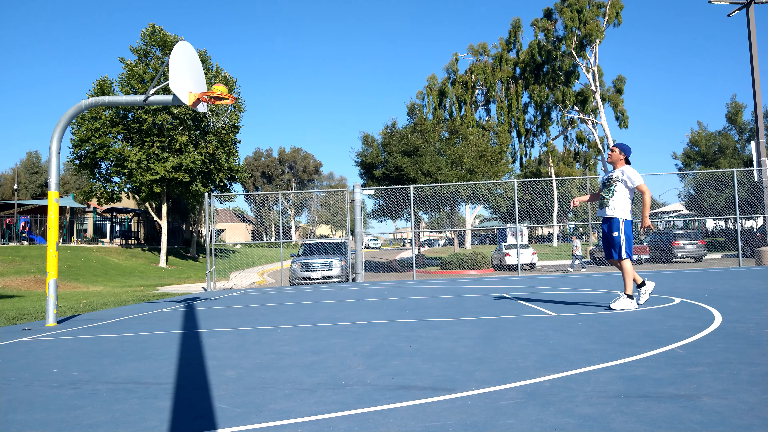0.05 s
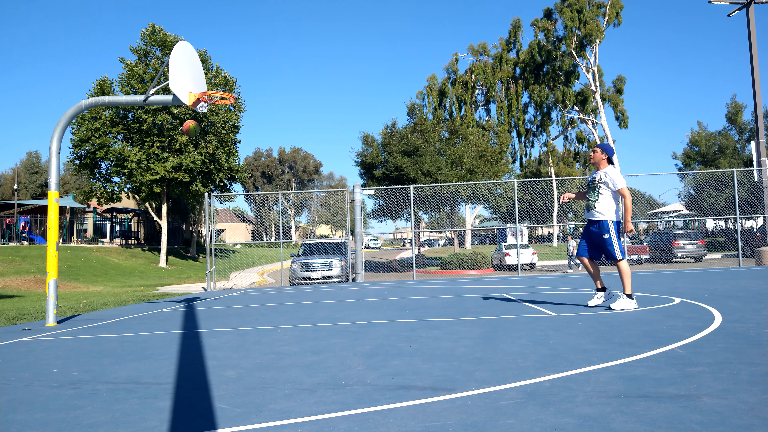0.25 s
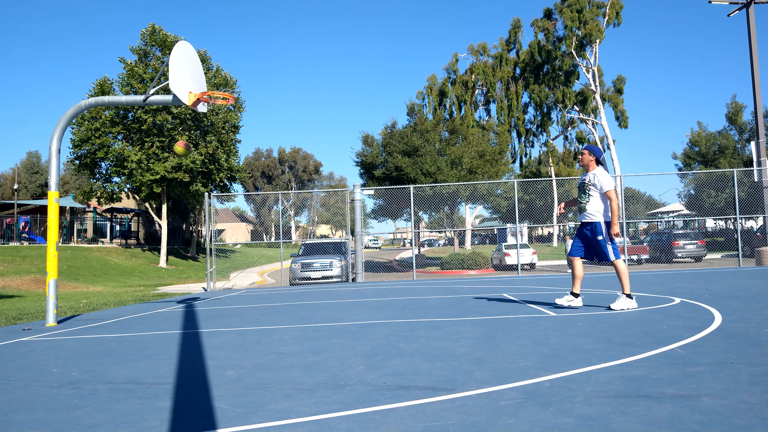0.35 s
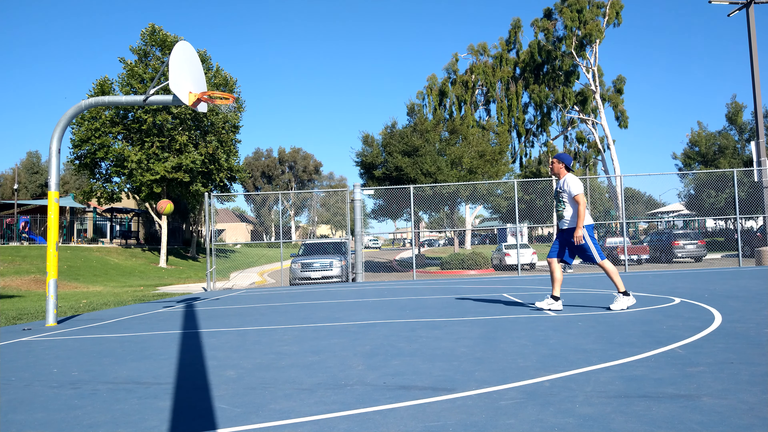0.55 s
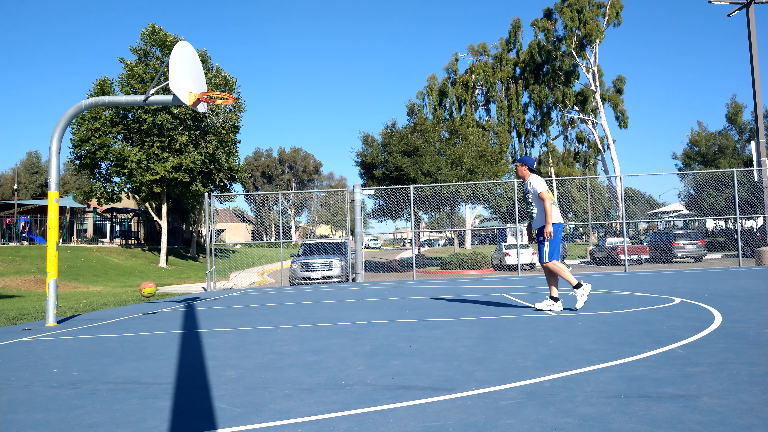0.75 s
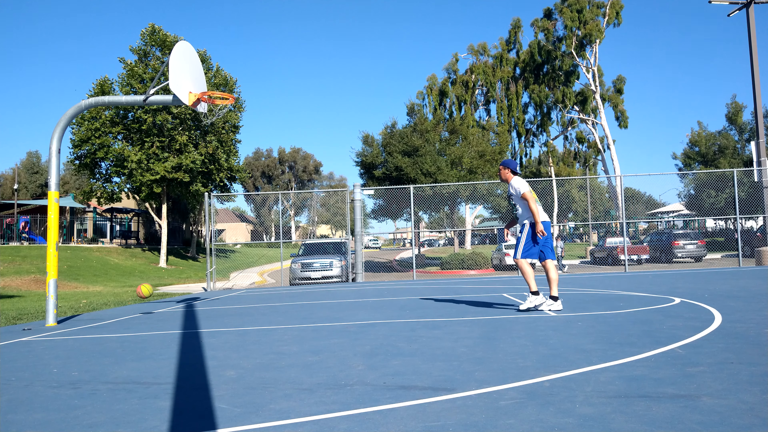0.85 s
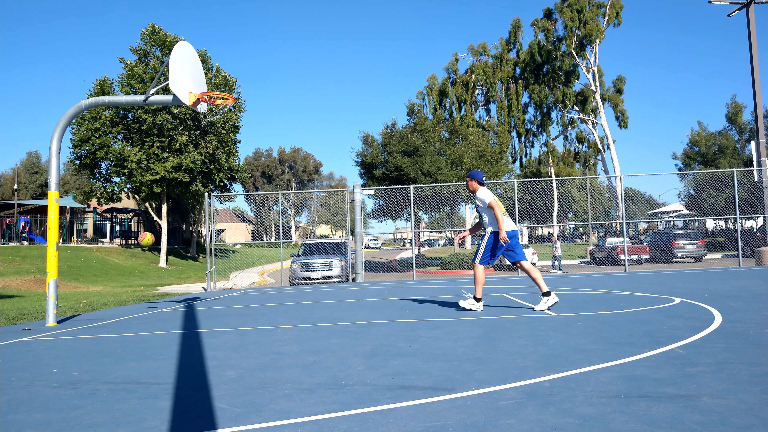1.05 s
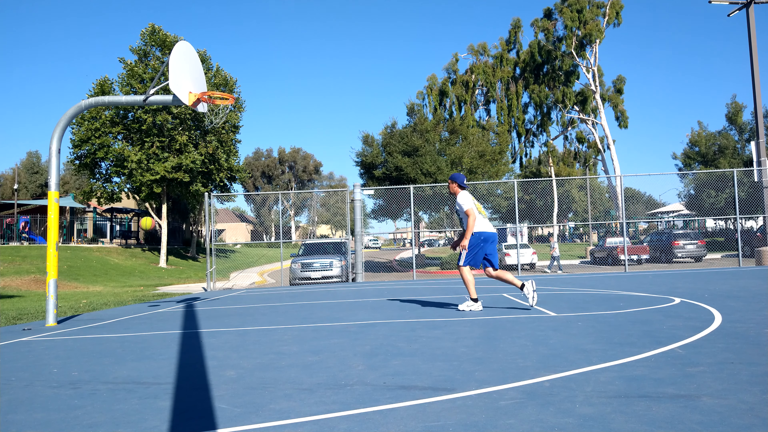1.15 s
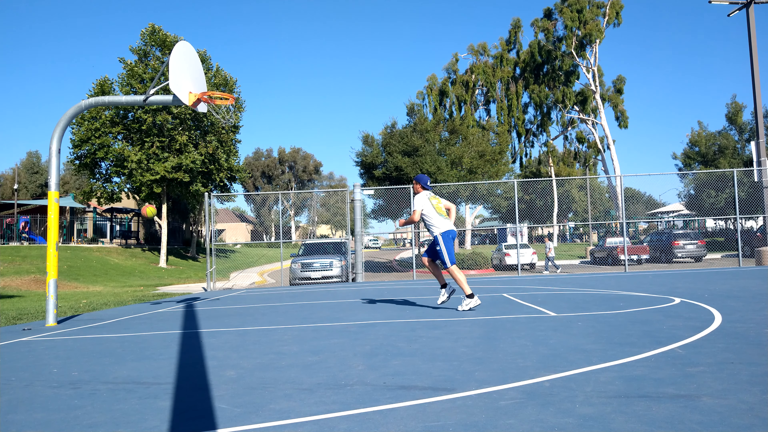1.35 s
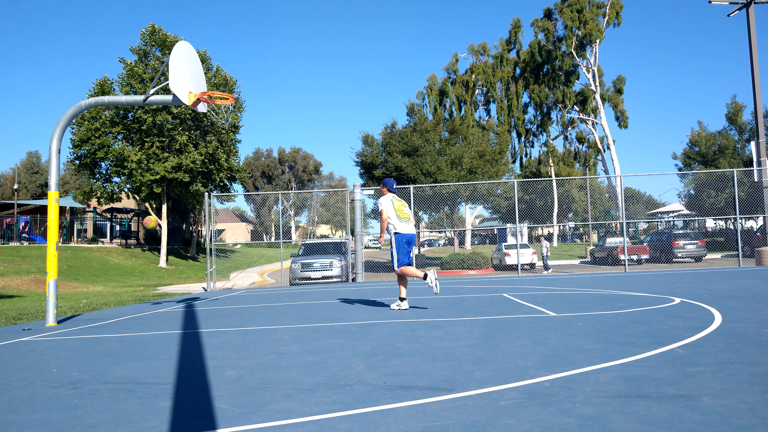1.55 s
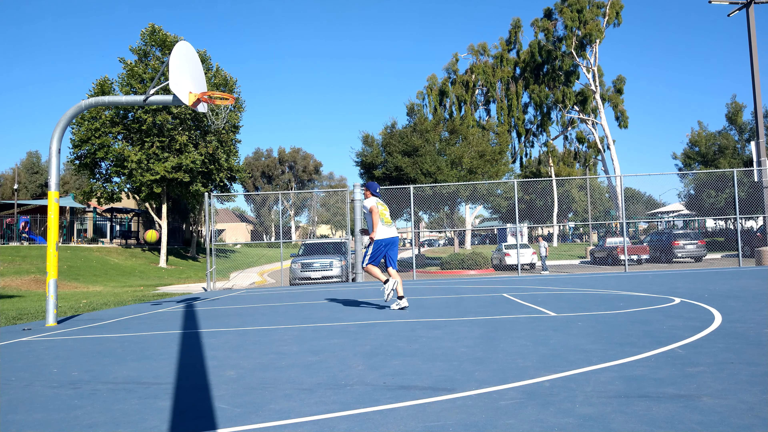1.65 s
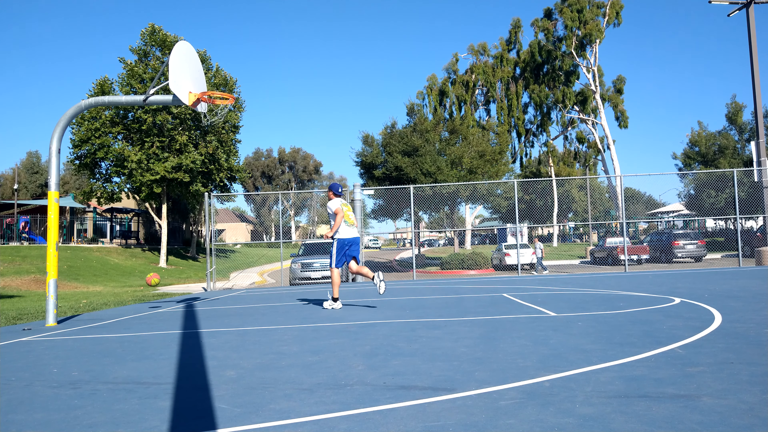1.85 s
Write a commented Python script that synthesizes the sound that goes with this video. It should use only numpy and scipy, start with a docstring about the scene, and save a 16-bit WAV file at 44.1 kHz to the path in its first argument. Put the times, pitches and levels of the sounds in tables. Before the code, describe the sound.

A basketball brushes through a chain net on the left at about 0.2 seconds, just after a soft step. The links jingle, swinging back loudly around 0.6 seconds, while hoop and backboard rattle. Just before 1 second the ball hits the asphalt with a sharp slap, a hollow ping and a short echo. Faint steps follow at 1.3 and 1.7 seconds as the chain settles. Distant traffic rumbles throughout.

```python
"""An outdoor basketball court, distant town rumble all round, the basket left of a stereo microphone.
A shoe lands softly, then the ball brushes through the chain net: the links jingle and swing back,
and the hoop and backboard rattle on. Just before the one-second mark the ball hits the asphalt with
a sharp slap and a ping of the air inside, echoing from the far side. Two more faint steps follow
from the player ahead while the chain settles."""
import sys
import numpy as np
from scipy import signal
from scipy.fft import rfft, irfft, next_fast_len
from scipy.io import wavfile

SR = 44100
rng = np.random.default_rng(int(sys.argv[2]) if len(sys.argv) > 2 else 0)


def persist_wave(psi):
    """Save psi, clipped to +-1, as 16-bit WAV."""
    counts = np.round(np.clip(psi, -1, 1) * 32767).astype(np.int16)
    wavfile.write(sys.argv[1], SR, np.atleast_2d(counts).T)


N = 83790

# links clashing and dragging on each other (time [s], level [dB])
LINK_CLASH = [(.217, -94), (.226, -44), (.255, -49.5), (.3, -49.5), (.38, -52.5), (.42, -63), (.465, -63),
              (.49, -53), (.53, -60.5), (.565, -40), (.628, -38), (.69, -51), (.8, -51.5), (.93, -58),
              (1.07, -74), (1.26, -63.5), (1.36, -74.5), (1.48, -69.5), (1.6, -83), (1.9, -94)]
LINK_HITS_PER_S, LINK_SPREAD_DB = 1800, 3.2
BOUNCE_S = .9474


def undb(db):
    """Decibels to gain."""
    return 10 ** (np.asarray(db) / 20)


def unit(x):
    """Scale to rms 1."""
    return x / np.sqrt(np.mean(x ** 2))


def energy_one(x):
    """Scale a response so that it keeps the power of what passes."""
    return x / np.sqrt(np.sum(x ** 2))


def clock():
    """Time of every sample in seconds."""
    return np.arange(N) / SR


def curve(rows):
    """Gain along (time [s], level [dB]) points."""
    return undb(np.interp(clock(), *np.array(rows).T))


def envelope(start, attack, hold, decay):
    """Linear attack, hold, exponential release, all in seconds."""
    t = clock() - start
    return np.clip(t / attack, 0, 1) * np.exp(-np.maximum(t - attack - hold, 0) / decay)


def convolve(x, response):
    """Pass a sound through a response."""
    return signal.fftconvolve(x, response)[:N]


def colour(x, points):
    """Minimum-phase filter through (frequency [Hz], gain [dB]) points."""
    size = 4096
    hz, db = np.array(points).T
    bin_hz = np.arange(size // 2 + 1) * SR / size
    gain = undb(np.interp(np.log(bin_hz + 1), np.log(hz), db))
    cepstrum = irfft(np.log(gain))
    cepstrum[1:size // 2] *= 2
    cepstrum[size // 2 + 1:] = 0
    return convolve(x, irfft(np.exp(rfft(cepstrum))))


def ring(start, hz, t60):
    """One decaying mode."""
    t = np.maximum(clock() - start, 0)
    return np.sin(2 * np.pi * hz * t) * np.exp(-np.minimum(np.log(1000) * t / t60, 100))


def strike(start, modes):
    """All modes of an object after one blow."""
    return sum(undb(db) * ring(start, hz, t60) for hz, db, t60 in modes)


def clicks(per_s, spread_db):
    """Random collisions of uneven strength, rms 1."""
    strength = undb(spread_db * np.minimum(rng.exponential(size=N), 4))
    hits = rng.random(N) < per_s / SR
    return unit(hits * strength * np.sign(rng.standard_normal(N)))


def noise(points):
    """Coloured noise, rms 1."""
    return unit(colour(rng.standard_normal(N), points))


def burst(start, attack, hold, decay):
    """A burst of white noise, energy 1."""
    return energy_one(rng.standard_normal(N) * envelope(start, attack, hold, decay))


def from_left(x, lag_s):
    """Sound from the left reaches the microphone's right side a little later."""
    size = next_fast_len(N + SR // 10)
    delay = np.exp(-2j * np.pi * np.fft.rfftfreq(size, 1 / SR) * lag_s)
    return np.array([x, irfft(rfft(x, size) * delay, size)[:N]])


def town():
    """Distant traffic, its low rumble nearly alike in both channels."""
    # traffic spectrum (frequency [Hz], gain [dB])
    traffic = [(15, -68), (25, -29.5), (87, -1), (195, -12.5), (301, -22), (394, -18.5), (489, -19.5),
               (531, -26), (1100, -25.5), (1230, -29), (1890, -32), (3620, -44), (16000, -60)]
    mid = noise(traffic)
    side = colour(noise(traffic), [(60, -14.5), (400, -5.5), (1500, 1.5), (8000, .5)])
    return undb(-58) * np.array([mid + side, mid - side])


def court(x):
    """Two scattered echoes from the surroundings and a thin open-air tail, for one channel."""
    # tone of the reflections (frequency [Hz], gain [dB])
    echo_colour = [(60, -13), (700, 10), (2000, 5.5), (6000, 3), (15000, 2)]
    t60_s = 1
    early = undb(-19) * burst(start=.046, attack=.0025, hold=.0025, decay=.01)
    late = undb(-31) * burst(start=.1775, attack=.0025, hold=0, decay=.005)
    tail = undb(-17.5) * burst(start=.036, attack=.017, hold=0, decay=t60_s / np.log(1000))
    tail = colour(tail, [(100, -1), (2000, -.5), (10000, -3.5)])
    return convolve(x, colour(early + late, echo_colour) + tail)


def steps():
    """Each shoe lands with a short tap and a soft thud."""
    # footfalls (time [s], heel tap [dB], thud [dB])
    footfalls = [(.172, -84.5, -47.5), (1.303, -46, -40.5), (1.6535, -38, -70)]
    # ring of a shoe (frequency [Hz], gain [dB], t60 [s])
    shoe_modes = [(630, -3.5, 0.026), (1520, -6.5, 0.0062), (4100, -11.5, 0.0021)]
    thud_hz, feet = 86.4, 0
    for s, tap_db, thud_db in footfalls:
        thud = np.sin(2 * np.pi * thud_hz * (clock() - s)) * envelope(s, .0014, .01, .014)
        feet += undb(thud_db) * thud - undb(tap_db) * strike(s, shoe_modes)
    return feet


def pole():
    """The shaking pole rumbles under the basket."""
    # strength of the shaking (time [s], level [dB])
    shaking = [(.16, -68.5), (.22, -49.5), (.4, -62.5), (.62, -52), (.9, -54), (1.1, -59.5), (1.33, -57),
               (1.45, -63)]
    # rumble spectrum (frequency [Hz], gain [dB])
    rumble = [(25, -33.5), (60, -8.5), (100, -5), (145, 2), (180, -10), (240, -5.5), (320, -19),
              (1000, -55)]
    return noise(rumble) * curve(shaking)


def hoop():
    """The swinging chain knocks on the hoop; hoop and backboard ring and rattle."""
    # strength of the rattle (time [s], level [dB])
    rattle = [(.217, -71), (.23, -47.5), (.3, -48.5), (.41, -50), (.44, -52.5), (.51, -44.5), (.545, -50.5),
              (.6, -43.5), (.7, -48), (.82, -43.5), (.93, -47), (1.05, -51.5), (1.15, -57.5), (1.29, -51.5),
              (1.37, -65.5), (1.58, -65.5), (1.9, -78.5)]
    # ring of hoop and backboard (frequency [Hz], gain [dB], t60 [s])
    modes = [(347, -9, .4), (450, -16, .15), (622, -2, .2), (700, 0, .27), (772, 0, .16), (870, -1, .25),
             (980, -7, .18), (1555, -15, .2), (1597, -17, .15), (1797, -19, .15), (2102, -18, .2),
             (2236, -15, .2)]
    # tone of the backboard (frequency [Hz], gain [dB])
    board_colour = [(120, -14.5), (250, -20), (480, -15.5), (650, -1.5), (920, -6.5), (1150, -18),
                    (2500, -19.5), (8000, -33)]
    # harder knocks on the hoop (time [s], level [dB])
    hard_knocks = [(.249, -43), (.44, -57), (.775, -54), (.82, -45)]
    # upper range of the hoop, rung by clashing links (frequency [Hz], gain [dB])
    upper_colour = [(900, -38.5), (1500, 4), (3000, 3.5)]
    taps_per_s, knock_t60_ratio = 350, .48
    response = energy_one(sum(undb(db) * energy_one(ring(0, hz, t60)) for hz, db, t60 in modes))
    ringing = convolve(clicks(taps_per_s, spread_db=.5) * curve(rattle), response)
    board = unit(colour(clicks(taps_per_s, spread_db=1), board_colour)) * curve(rattle)
    damped = [(hz, db, t60 * knock_t60_ratio) for hz, db, t60 in modes]
    knocks = sum(undb(db) * strike(s, damped) for s, db in hard_knocks)
    link_hits = clicks(LINK_HITS_PER_S, LINK_SPREAD_DB) * curve(LINK_CLASH)
    bright = convolve(link_hits, energy_one(colour(response, upper_colour)))
    return undb(-3.5) * (ringing + board) + undb(-8.5) * bright + knocks


def brush():
    """The ball scrapes into the net and jerks it taut."""
    # touches on the net (time [s], level [dB], attack [s], hold [s], decay [s])
    touches = [(.219, -40, .004, .026, .012), (.2485, -31, .001, .004, .003),
               (.2565, -35, .001, .002, .003)]
    # scrape spectrum (frequency [Hz], gain [dB])
    scrape = [(80, -25), (260, -9.5), (480, -6.5), (620, -3.5), (760, 7), (900, 0.5), (1120, 1), (1350, -4),
              (1750, -4.5), (2600, -15), (3300, -26.5), (4500, -23), (8000, -35.5)]
    return noise(scrape) * sum(undb(db) * envelope(s, *shape) for s, db, *shape in touches)


def chain():
    """Links of slightly different pitch jingle, and clash against each other."""
    # how hard the chain shakes (time [s], level [dB])
    shaking = [(.217, -102), (.226, -52.5), (.258, -40.5), (.32, -54), (.35, -45.5), (.39, -51.5),
               (.41, -63), (.465, -66), (.485, -67), (.53, -68), (.565, -45.5), (.628, -41.5), (.69, -70),
               (.74, -53), (.93, -62), (1.26, -63.5), (1.36, -78), (1.43, -75), (1.6, -85), (1.9, -75.5)]
    # bunches of links snapping together (time [s], level [dB])
    snaps = [(0.477, -51.5), (0.62, -40.5), (0.73, -48.5), (1.2, -72), (1.42, -64.5), (1.477, -69.5)]
    # ring of a link (frequency [Hz], gain [dB], t60 [s])
    link_modes = [(3797, -19, 0.06), (4640, -13, 0.057), (6030, -40, 0.032), (7520, -27, 0.022),
                  (8580, 1.5, 0.029), (9010, 3, 0.027), (10900, -4, .03), (11166, 0.5, 0.034),
                  (13230, -7, 0.031), (13880, 1, 0.056)]
    # tone of link on link (frequency [Hz], gain [dB])
    clash_colour = [(300, -23), (1100, -12.5), (1650, 4.5), (2350, 3), (2900, -3.5), (3250, -14.5),
                    (3900, 0.5), (4250, -9), (4550, -5), (5400, -16.5), (6100, -10.5), (7500, -15.5),
                    (10000, -11), (15000, -29)]
    clinks = sum(undb(db) * envelope(s, .0011, .0032, decay=.013) for s, db in snaps)
    jingle = 0
    for detune in (-1, -.86, -.23, .98, 2):  # in steps of 0.8 %
        modes = [(hz * (1 + .008 * detune), db, t60) for hz, db, t60 in link_modes]
        hits = clicks(LINK_HITS_PER_S, LINK_SPREAD_DB) * (curve(shaking) + clinks)
        jingle += convolve(hits, energy_one(strike(0, modes))) / (2 + abs(detune) / 2)
    clash = unit(colour(clicks(LINK_HITS_PER_S, LINK_SPREAD_DB), clash_colour))
    clash *= curve(LINK_CLASH) + undb(-3) * clinks
    return undb(-4.5) * jingle + undb(-1.5) * clash


def slap():
    """Air squeezed from under the ball: a gritty crack that falls in pitch as the contact patch grows."""
    # tone of ball on asphalt (frequency [Hz], gain [dB])
    slap_colour = [(100, -24.5), (700, -4), (1400, -0.5), (2000, -2), (2700, -1), (3400, -8), (4900, -8),
                   (5700, -13), (9000, -14.5), (12000, -22), (16000, -44)]
    sweep_s, sweep_hz, push_s = .0024, 4500, .002
    hz = np.fft.rfftfreq(N, 1 / SR)
    arrival_s = BOUNCE_S + sweep_s * np.exp(-hz / sweep_hz)  # highs arrive first
    crack = irfft(np.exp(-2j * np.pi * np.cumsum(arrival_s) * SR / N), N)
    grit = undb(-9) * burst(BOUNCE_S, attack=.0006, hold=0, decay=.0015)
    push = np.sin(np.pi * np.clip((clock() - BOUNCE_S) / push_s, 0, 1)) ** 2
    return undb(10) * colour(crack + grit, slap_colour) - undb(-20) * push


def ball_body():
    """The shell flexes with a thump; the air inside pings as the ball lands, squashes and leaves."""
    # ring of the air inside (frequency [Hz], gain [dB], t60 [s])
    air_modes = [(260, -5, 0.072), (353, 0, 0.033), (445, 2, 0.068), (880, 9, 0.014), (1064, 11.5, 0.016),
                 (1110, -13, 0.012), (1790, 2.5, 0.014), (2020, -7, 0.07)]
    thump_hz, flex_s = 103, BOUNCE_S + .0027
    contact_s, ping_rise_s = .0128, .0009
    thump = np.sin(2 * np.pi * thump_hz * (clock() - flex_s)) * envelope(flex_s, .0027, .0061, .0046)
    ping = 0
    for fraction, db in ((1 / 3, -46), (3 / 4, -36), (1, -30)):
        start = BOUNCE_S + contact_s * fraction
        rise = np.clip((clock() - start) / ping_rise_s, 0, 1)
        ping += undb(db) * strike(start, air_modes) * rise
    return undb(-22.5) * thump + ping


def scene():
    """From the microphone: basket and ball to the left, the player ahead, the town far off all round."""
    # channel balance of basket and ball (frequency [Hz], left minus right [dB])
    balance = [(60, 12), (200, -5), (380, 6.5), (700, 0), (1290, -1.5), (2400, 3.5), (4400, 5),
               (8100, -0.5), (10500, -11), (13800, 9)]
    basket = chain() + hoop() + pole() + brush()
    ball = slap() + ball_body()
    feet = steps()
    scattered = np.array([convolve(basket, burst(.00076, .0021, .0014, .0072)) for _ in range(2)])
    near = from_left(basket, lag_s=.00013) + undb(-6) * scattered + from_left(ball, lag_s=.00017)
    for channel, sign in enumerate((1, -1)):
        near[channel] = colour(near[channel], [(hz, sign * db / 2) for hz, db in balance])
    echoes = np.array([court(basket + ball + feet) for _ in range(2)])
    return near + feet + echoes + town()


def record(dry):
    """The recorder cuts the top with a steep low-pass."""
    top_hz = 15200
    return signal.sosfilt(signal.ellip(8, .2, 70, top_hz, fs=SR, output="sos"), dry)


dry = scene()
out = record(dry)
persist_wave(out)
```